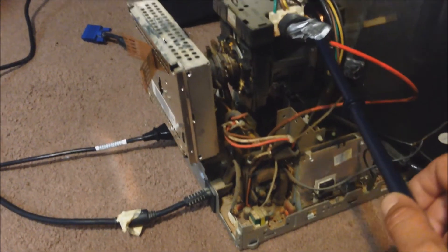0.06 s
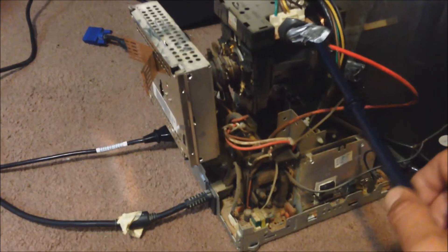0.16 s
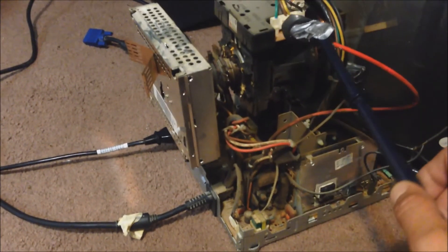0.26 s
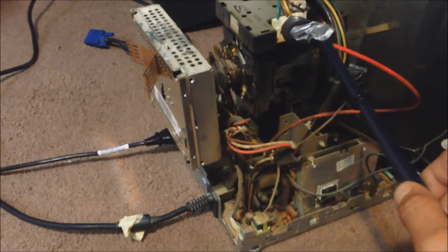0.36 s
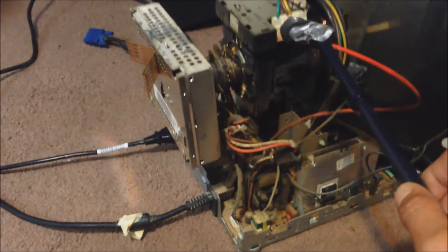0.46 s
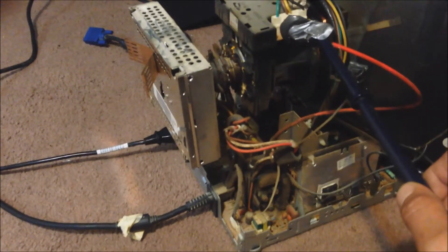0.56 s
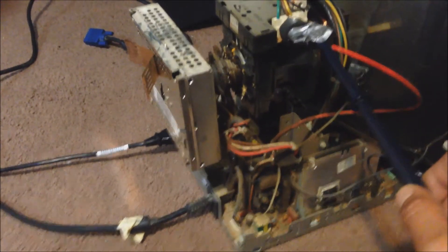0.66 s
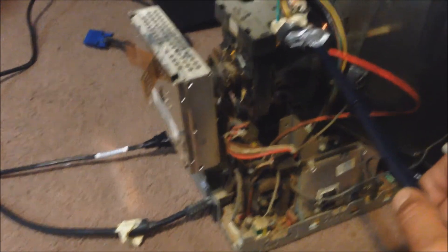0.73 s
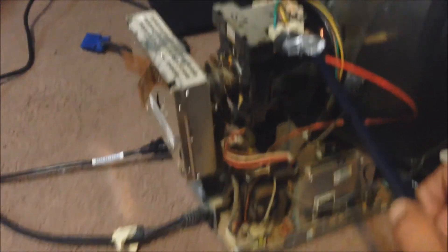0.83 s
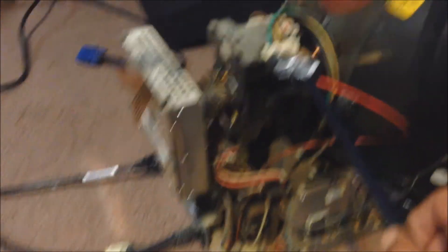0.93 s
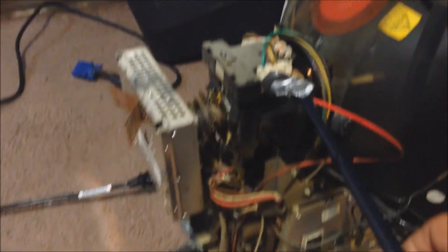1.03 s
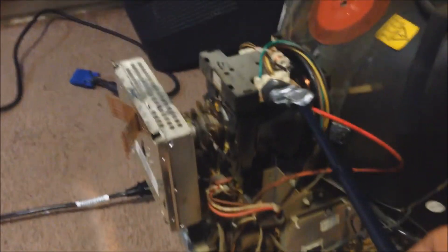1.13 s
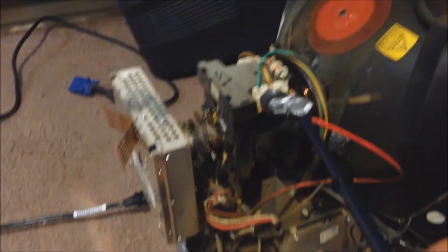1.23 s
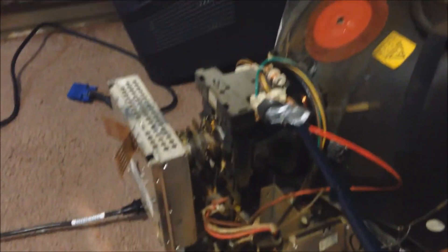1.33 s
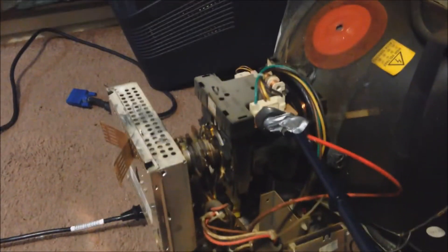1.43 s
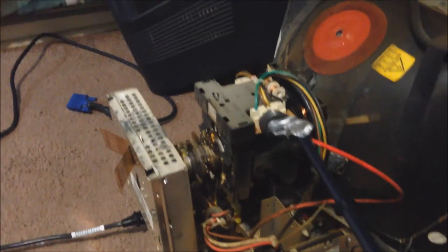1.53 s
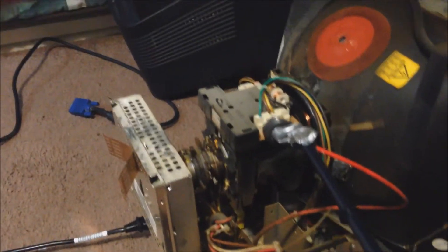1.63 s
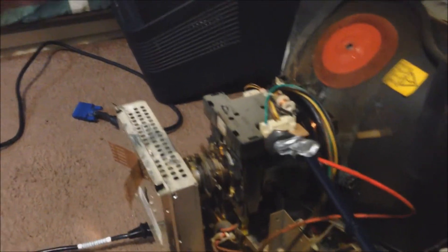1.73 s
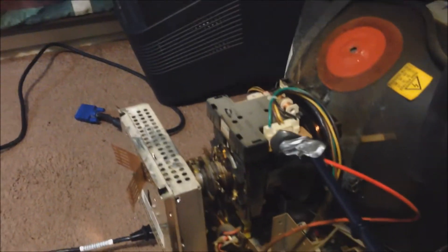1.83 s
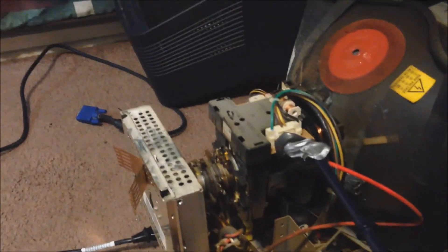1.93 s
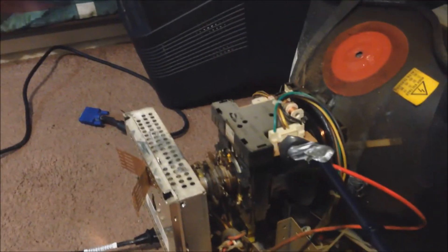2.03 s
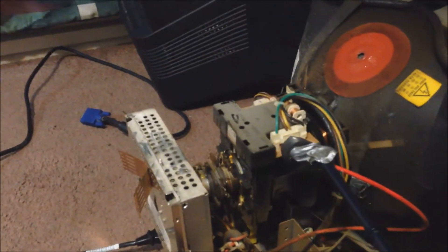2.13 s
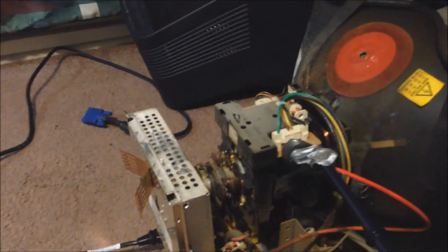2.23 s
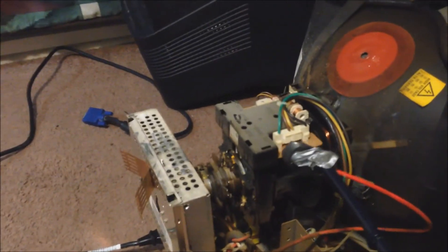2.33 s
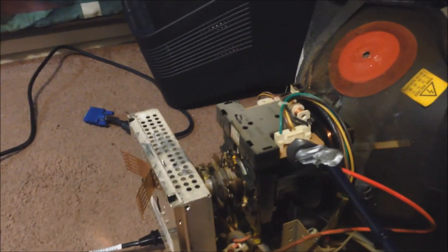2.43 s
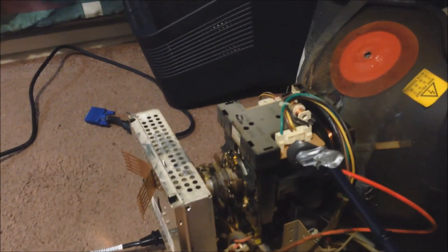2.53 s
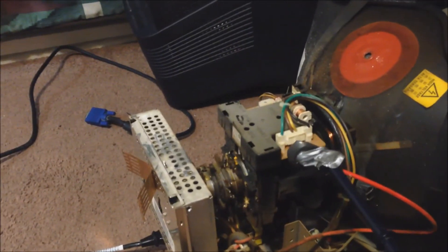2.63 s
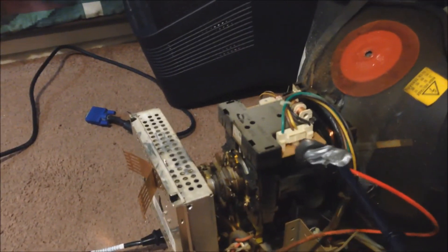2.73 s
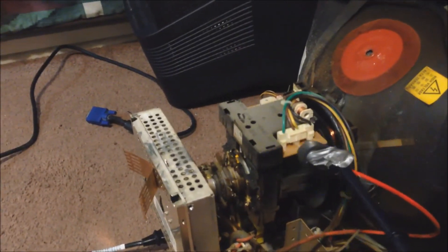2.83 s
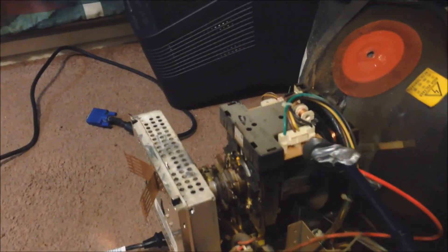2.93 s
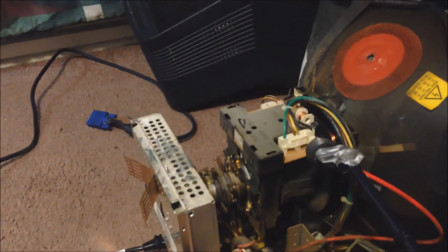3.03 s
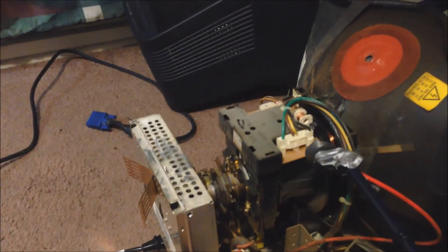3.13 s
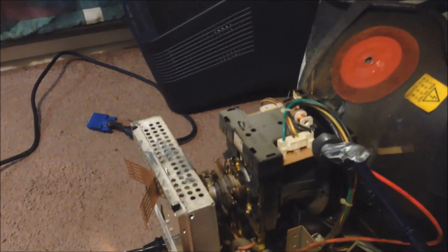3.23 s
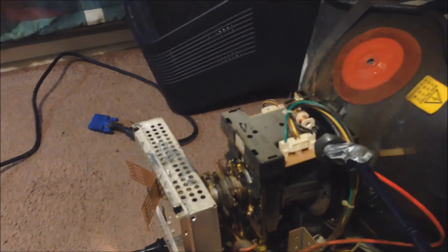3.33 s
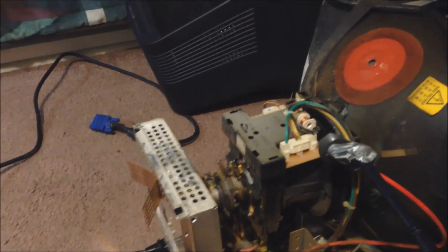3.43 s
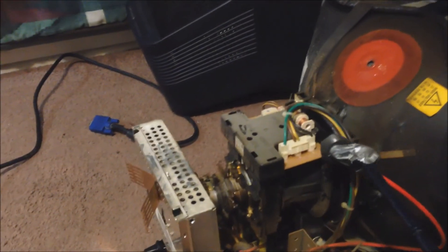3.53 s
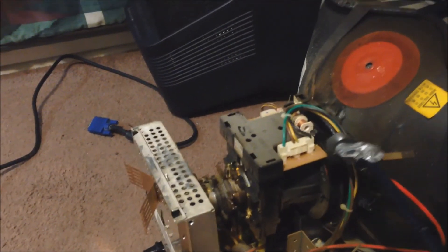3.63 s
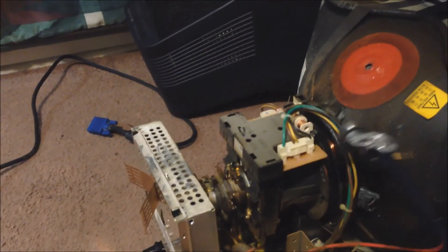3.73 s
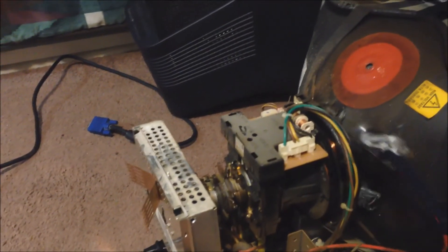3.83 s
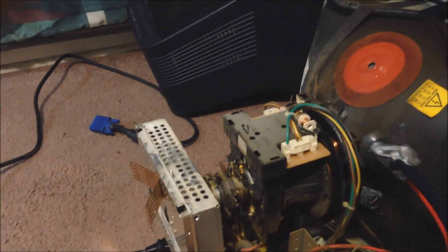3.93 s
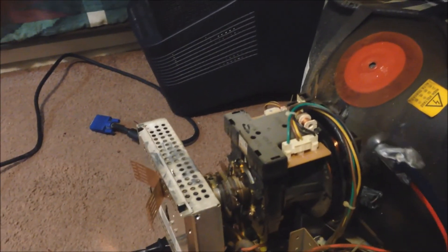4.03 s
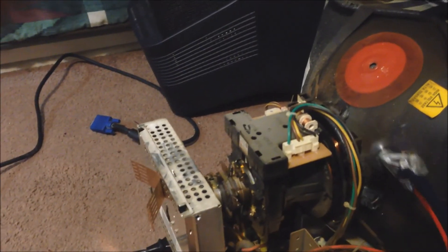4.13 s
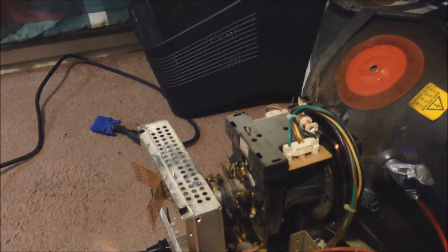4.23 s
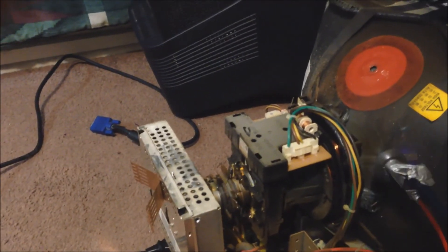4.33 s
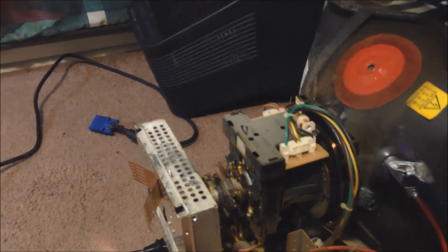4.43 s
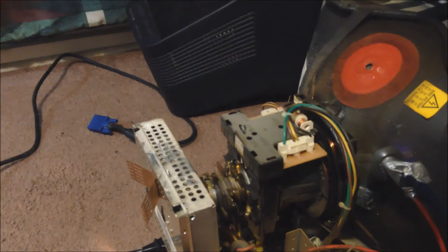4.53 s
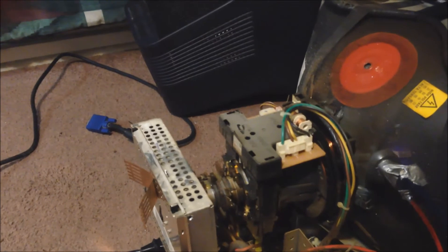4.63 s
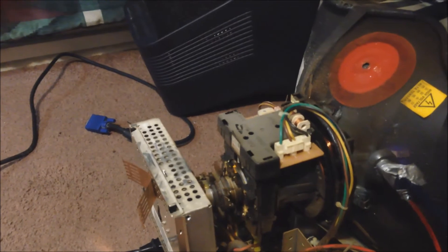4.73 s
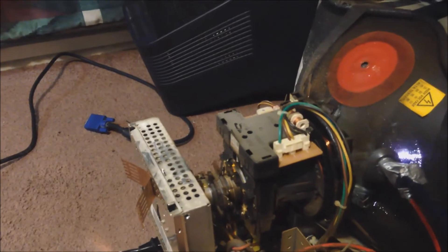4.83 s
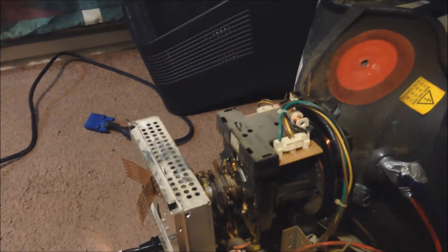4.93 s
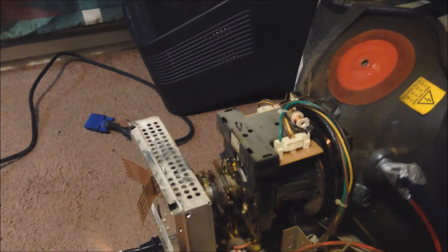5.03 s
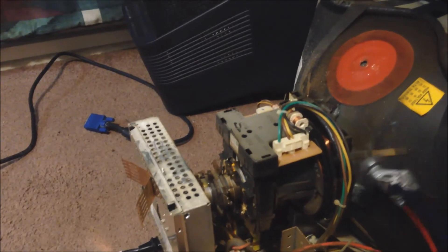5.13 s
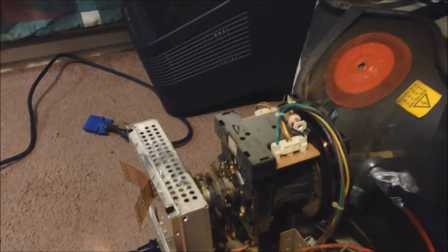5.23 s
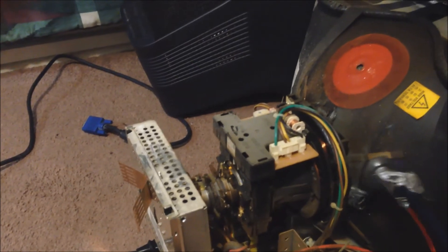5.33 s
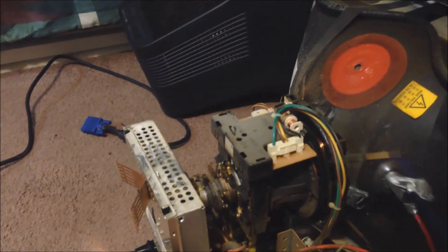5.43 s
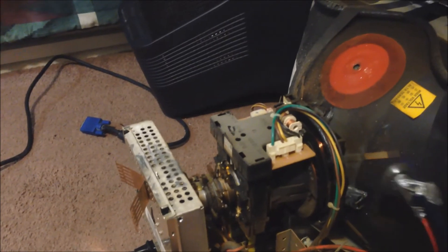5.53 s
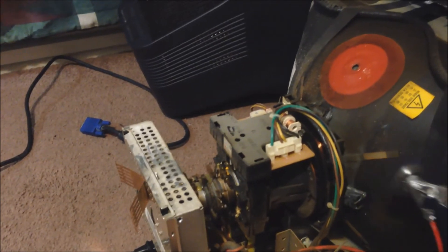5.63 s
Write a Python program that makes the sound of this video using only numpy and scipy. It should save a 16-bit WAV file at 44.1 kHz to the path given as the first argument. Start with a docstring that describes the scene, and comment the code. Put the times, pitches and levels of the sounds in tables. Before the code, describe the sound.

Close in a small room, an electric probe over a dismantled monitor gives a faint, gritty, bright hiss above low rumble and hum. Two sharp snaps crack out about a second apart, each dulling the hiss briefly. Later a rasping spark whine rises, a third and loudest snap cuts it off, hiss rebuilds and the rasp returns. One microphone, overloaded by the snaps.

```python
"""Corona hisses at the tip of a high-voltage probe drawn over the back of a bare picture tube in a small room:
noise of uneven grain, coloured by resonances. Near the glass a relaxation oscillation adds a rasping spark train.
Three times the gap flashes over: decaying chassis modes, a crack and a room tail overload the microphone,
and the hiss has to build up again. Stray sparks and knocks are noise bursts; low sine tones glide over a rumble."""
import sys
import numpy as np
from scipy import signal
from scipy.fft import rfft, irfft
from scipy.io import wavfile
from scipy.ndimage import uniform_filter1d

SR = 44100
rng = np.random.default_rng(int(sys.argv[2]) if len(sys.argv) > 2 else 0)


def persist_wave(psi):
    """Save psi, clipped to +-1, as 16-bit WAV."""
    counts = np.round(np.clip(psi, -1, 1) * 32767).astype(np.int16)
    wavfile.write(sys.argv[1], SR, np.atleast_2d(counts).T)


N = 250047
T = np.arange(N) / SR  # time of each sample [s]

# Corona strength at the probe tip, before surge, drain and flutter: (time [s], level [dB])
CORONA_LEVEL = [(0, -52.5), (.08, -49), (.19, -54.5), (.26, -48.5), (.95, -45.5), (1.1, -47.5),
                (1.98, -48.5), (2.01, -42), (2.5, -56.5), (2.84, -55), (3.26, -48.5), (3.39, -53.5),
                (3.44, -58), (3.52, -60.5), (3.59, -51.5), (3.95, -48), (4.05, -46.5), (5.26, -44.5),
                (5.35, -49)]
# Corona spectrum: (frequency [Hz], level [dB])
CORONA_SPECTRUM = [(300, -17), (1250, -8.5), (1750, 2.5), (2400, 0), (2750, -7), (3100, -7.5), (4000, -5),
                   (5000, -0.5), (7400, -3), (8700, -1), (10800, -1.5), (13000, 2.5), (15200, 6)]
# Moving resonance of the hollow between probe and chassis: (time [s], frequency [Hz], strength [dB])
HOLLOW_RESONANCE = [(0, 6200, 0), (.2, 5960, -8), (.27, 4570, -15.5), (.95, 4730, 6.5), (1.1, 5430, -9.5),
                    (1.9, 6060, -11), (2.5, 8310, -4.5), (3.3, 8430, -5.5), (3.9, 8460, -2.5)]
# The corona swells before a flashover, then stays down until the gap has recharged
SURGE_DB, SURGE_S, DRAINED_DB, RETURN_S = 10, 0.058, -10, 0.044


def corona(grain_db=-0.5, flutter_db=1.0, sputter_db=10.0):
    """Corona discharge: countless micro-discharges of uneven size sum to noise, coloured by a cavity."""
    level_db = curves(CORONA_LEVEL)[0]
    for s, *_, recharge_s in FLASHOVERS:
        surge = SURGE_DB * np.exp(-abs(T - s) / SURGE_S)
        drained = DRAINED_DB * np.clip((s + recharge_s - T) / RETURN_S + .5, 0, 1)
        level_db = level_db + np.where(T < s, surge, drained)
    level = amp(level_db)
    grain = amp(grain_db * np.minimum(rng.exponential(1, N), 4))
    pops = rng.standard_normal(N) * grain
    hiss = through_gaps(coloured(pops, CORONA_SPECTRUM), depth=0.28)
    hollow_hz, hollow_db = curves(HOLLOW_RESONANCE)
    hiss += amp(hollow_db) * resonate(hiss, hollow_hz, width=270)
    # close to breakdown, where the level is high, the discharge begins to sputter
    flutter = flutter_db * wander(hz=39.8)
    sputter = sputter_db * (level / level.max()) ** 2 * wander(hz=160)
    return evened(hiss) * level * amp(flutter + sputter)


# Spark trains, one sub-table each, with the scatter of the gaps in time as a share:
# (time [s], mean rate [sparks/s], level [dB], scatter [1])
SPARK_TRAINS = [
    [(4.0, 1300, -58, .16), (4.05, 1600, -48.5, 0.13), (4.115, 1660, -51, .12), (4.14, 1230, -52.5, .18),
     (4.21, 1240, -50, .15), (4.275, 1450, -41.5, .145), (4.32, 1800, -37.5, .1), (4.6, 1880, -34.5, .098),
     (4.85, 1963, -32, .097), (4.92, 2100, -27.5, .15)],
    [(5.32, 1750, -58.5, 0.13), (5.45, 1810, -39.5, .115), (5.55, 1880, -37.5, 0.053),
     (5.61, 1740, -40, .068), (5.67, 1710, -36, 0.066)],
]
# Spark spectrum: (frequency [Hz], level [dB])
SPARK_SPECTRUM = [(300, -4), (800, 6.5), (1350, 0.5), (1700, 6.5), (2050, 1.5), (2350, -1), (3000, 0),
                  (3350, -1.5), (4100, -5.5), (5400, -2), (6800, -4), (10000, -4), (12500, -5),
                  (15200, -1.5)]
# Whine strength at the usual scatter, and its loss each time the scatter doubles
USUAL_SCATTER, WHINE_DB, WHINE_LOSS_DB = 0.1, -5, 6


def spark_train(drift=0.034, size_db=2.5, wet_db=-2, undertone_db=-20):
    """Relaxation oscillation: the gap charges and fires repeatedly; uneven gaps make a rasping whistle."""
    all_rows = [row for rows in SPARK_TRAINS for row in rows]
    rate, level_db, scatter = curves(all_rows)
    # the more evenly the gap fires, the stronger the whine
    whine_db = WHINE_DB - WHINE_LOSS_DB * np.log2(scatter / USUAL_SCATTER)
    rate = rate * np.exp(drift * wander(hz=54.7) + scatter * wander(hz=925))
    turns = np.cumsum(rate) / SR
    # one spark at each whole turn; subtracting the mean rate removes the offset
    fires = np.diff(np.floor(turns), prepend=0)
    sizes = amp(size_db * wander(hz=600))
    sparks = coloured((fires - rate / SR) * sizes, SPARK_SPECTRUM)
    # the heated air swells once a spark; a faint undertone lies at half that rate
    whine = np.cos(2 * np.pi * turns) + amp(undertone_db) * np.cos(np.pi * turns)
    level = amp(level_db) * sum(gate(rows, fade=0.0013) for rows in SPARK_TRAINS)
    direct = (through_gaps(sparks, depth=1.0) + amp(whine_db) * whine) * level
    return direct + reverberated(direct, wet_db)


# Resonances of the gaps between tube, yoke and chassis, lift before the depth factor:
# (frequency [Hz], width [Hz], lift [dB])
GAP_RESONANCES = [(2490, 65, 1.5), (3920, 490, 5), (4584, 92, 10), (5230, 710, 5), (5930, 180, -1.5),
                  (6240, 340, 3), (6600, 170, -1.5), (8020, 250, 6), (8900, 120, 3.5), (9750, 370, 3.5),
                  (10490, 200, 2.5), (12200, 330, 1), (13910, 330, 4.5), (14900, 440, 2)]


def through_gaps(x, depth, linger_s=.0005):
    """Resonant transmission: narrow bands change in level, with group delay linger_s per dB of lift."""
    hz = np.fft.rfftfreq(N, 1 / SR)
    bells = [db * np.exp(-2 * ((hz - centre) / width) ** 2) for centre, width, db in GAP_RESONANCES]
    lift_db = depth * sum(bells)
    # phase is the integral of group delay over frequency
    lag = 2 * np.pi * np.cumsum(linger_s * lift_db) * SR / N
    return evened(irfft(rfft(x) * amp(lift_db) * np.exp(-1j * lag), N))


# Flashovers; tuning multiplies the chassis frequencies, bounce is the delay of the echo off the glass:
# (time [s], blast [dB], blast centre [Hz], tuning [1], bounce [s], crack [dB], room [dB],
#  noise before the snap [dB], recharge time [s])
FLASHOVERS = [(2.0721, -6, 1620, 0.95, 0.0027, -8, -9.5, -23.5, 0.34),
              (2.8865, -6.5, 1037, .96, 0.00213, -5, -11, -18, .32),
              (4.9262, -1, 884, 0.946, 0.00097, -2.5, -9, -28.5, .29)]
# Chassis modes under a blast, before tuning: (frequency [Hz], level [dB], t60 [s])
CHASSIS_MODES = [(560, 1.5, 0.02), (740, -1, 0.033), (975, 1.5, 0.011), (1344, -3.5, 0.018),
                 (1747, 0.5, 0.018), (2267, 0.5, 0.01), (3440, -12, 0.011)]


def snaps(clump_db=3, clump_s=0.054, bounce=0.52, crack_s=0.0045, build_s=.006, blast_octaves=0.91,
          thump_db=-17, thump_hz=110, thump_s=0.0032):
    """Impulse excitation: a flashover rings the chassis modes, with a bright crack, a thump and the room."""
    out = np.zeros(N)
    for s, blast_db, hz, tuning, bounce_s, crack_db, room_db, *_ in FLASHOVERS:
        tail = room_tail()
        t = np.arange(len(tail)) / SR
        blast = np.zeros(len(t))
        for k, (f, db, t60) in enumerate(CHASSIS_MODES):
            share = np.exp(-.5 * (np.log2(f / hz) / blast_octaves) ** 2)
            decay = amp(db - 60 * t / t60)
            # neighbouring modes swing in opposite senses
            blast += (-1) ** k * share * decay * np.sin(2 * np.pi * f * tuning * t)
        blast += bounce * np.interp(t - bounce_s, t, blast, left=0)
        crack = coloured(rng.standard_normal(len(t)), TAIL_SPECTRUM) * np.exp(-(t / crack_s) ** 2)
        thump = np.sin(2 * np.pi * thump_hz * t) * np.exp(-t / thump_s)
        # the first reflections arrive in uneven clumps
        clumps = amp(clump_db * wander(hz=170)[:len(t)] * np.exp(-t / clump_s))
        room = tail * (1 - np.exp(-t / build_s)) * clumps
        add(out, s, amp(blast_db) * blast + amp(crack_db) * crack)
        add(out, s, amp(thump_db) * thump + amp(room_db) * room)
    return out


# Spectrum of the crack and of the room's answer: (frequency [Hz], level [dB])
TAIL_SPECTRUM = [(60, -14.5), (300, -5), (700, -4.5), (1500, -0.5), (2500, -1), (3300, -0.5), (5500, 1.5),
                 (8000, 0), (10500, 0.5), (13000, 3.5), (15200, 2)]
# Reverberation time of the room: (frequency [Hz], t60 [s])
ROOM_DECAY = [(100, 0.094), (600, 0.16), (1500, 0.28), (5000, 0.27), (15000, 0.22)]


def room_tail():
    """Diffuse reverberation: dense reflections act as noise, each band dying at its own speed."""
    noise = coloured(rng.standard_normal(SR // 2), TAIL_SPECTRUM)
    hz, t, z = signal.stft(noise, SR, nperseg=256)
    decay = amp(-60 * t / read(ROOM_DECAY, hz)[:, None])
    return signal.istft(z * decay, SR, nperseg=256)[1]


def reverberated(direct, wet_db):
    """Linear superposition: convolution with a room tail of unit energy gives the reverberant part."""
    tail = room_tail()
    return amp(wet_db) * signal.fftconvolve(direct, tail / np.linalg.norm(tail))[:N]


# Peak of the noise ahead of the snap, and its exponential time constants
PRE_AHEAD_S, PRE_RISE_S, PRE_DECAY_S = 0.008, 0.0032, 0.0033


def pre_snap_noise():
    """Exponential envelope: soft dull noise swells and fades before each snap."""
    out = np.zeros(N)
    noise = band_noise(1350, 0.73, size=N)
    for s, *_, pre_db, _ in FLASHOVERS:
        t = T - s + PRE_AHEAD_S
        out += amp(pre_db) * noise * np.exp(np.minimum(t / PRE_RISE_S, -t / PRE_DECAY_S))
    return out


# Spacing, level of the first burst and change of level for the second burst
AFTER_S, AFTER_DB, AFTER_LOSS_DB = .0193, -15, -11


def after_bursts():
    """Exponential decay: two short dull noise bursts follow each snap, the second weaker."""
    out = np.zeros(N)
    for s, *_ in FLASHOVERS:
        for k in range(2):
            after_db = AFTER_DB + k * AFTER_LOSS_DB
            add(out, s + (k + 1) * AFTER_S, burst(after_db, hz=1130, octaves=0.31, decay_s=0.0013))
    return out


# Stray single sparks: (time [s], level [dB], centre [Hz], width [octaves], decay constant [s])
STRAY_SPARKS = [(.972, -39, 6000, 5.4, 0.012), (1.01, -41, 8000, 2.64, 0.0027),
                (1.044, -40.5, 5000, 2.4, 0.0087), (2.0, -35.5, 6000, 2, 0.0031),
                (2.622, -53.5, 7100, 1.7, 0.004), (3.526, -21, 13300, 0.55, 0.0023)]


def stray_sparks():
    """Impulsive discharge: each single spark is a short decaying burst of noise."""
    out = np.zeros(N)
    for s, *spark in STRAY_SPARKS:
        add(out, s, burst(*spark))
    return out


# Soft knocks of handling: (time [s], level [dB])
HANDLING_KNOCKS = [(.35, -54.5), (.872, -45.5), (2.24, -48), (2.775, -52)]


def knocks():
    """Damped impact: each knock is a narrow, quickly decaying burst of noise."""
    out = np.zeros(N)
    for s, db in HANDLING_KNOCKS:
        add(out, s, burst(db, hz=590, octaves=0.29, decay_s=0.007))
    return out


def ticks(wet_db=-18):
    """Superposition of the brief sounds, with a little reverberation."""
    direct = stray_sparks() + knocks() + pre_snap_noise() + after_bursts()
    return direct + reverberated(direct, wet_db)


# Low hum, one sub-table a glide, level before boom and waver: (time [s], pitch [Hz], level [dB])
HUM_GLIDES = [
    [(0, 172, -57.5), (.5, 166.6, -53), (.66, 162, -65), (.76, 158, -59.5), (.98, 156, -59.5),
     (1.08, 150, -64), (1.8, 144.5, -59.5), (2.03, 143.9, -57)],
    [(2.13, 155.8, -57.5), (2.39, 173.7, -51.5), (2.52, 180, -73), (2.68, 184, -55)],
    [(3.17, 221, -61.5), (3.48, 215, -53), (3.76, 227.6, -58.5)],
    [(3.7, 74.85, -56), (3.96, 82.7, -54), (4.27, 89.2, -50.5), (4.48, 88, -54), (4.66, 99.1, -59),
     (4.88, 104.9, -55.5)],
    [(5.35, 90.9, -66), (5.56, 92.6, -63), (5.67, 102.7, -50.5)],
]
# Octave relative to the note before boom, by pitch of the note: (pitch [Hz], level [dB])
OCTAVE_LEVEL = [(77, 3), (88, -7.5), (101, 4.5), (150, -25.5)]
MAINS_HZ, MAINS_DB = 55.7, -59


def hum(waver_db=1.1):
    """Modal amplification: a low note glides through the room's modes, with its octave and a mains hum."""
    out = amp(MAINS_DB) * np.sin(2 * np.pi * MAINS_HZ * T)
    for rows in HUM_GLIDES:
        hz, db = curves(rows)
        phase = 2 * np.pi * (np.cumsum(hz) / SR + rng.random())
        fundamental = amp(boom_db(hz)) * np.sin(phase)
        octave = amp(read(OCTAVE_LEVEL, hz)) * np.sin(2 * phase)
        out += gate(rows, fade=0.01) * amp(db) * (fundamental + octave)
    # the root of 2 turns rms levels into sine amplitudes
    return np.sqrt(2) * out * amp(waver_db * wander(hz=9.7))


# Modes of the room that make the hum boom: (frequency [Hz], width [Hz], lift [dB])
BOOM_MODES = [(82.4, 4.7, 9), (157, 4.8, 7.5), (174.55, 9.2, 13)]


def boom_db(hz):
    """Room resonance: each mode lifts a low tone along a bell curve of frequency."""
    return sum(db / (1 + (2 * (hz - centre) / width) ** 2) for centre, width, db in BOOM_MODES)


# Rumble spectrum: (frequency [Hz], level [dB])
RUMBLE_SPECTRUM = [(15, -40), (28, -17.5), (42, -3.5), (58, 0.5), (100, -3), (140, -5.5), (185, -7.5),
                   (222, -6), (260, -10), (310, -9), (460, -15), (700, -21.5), (1300, -27.5), (2500, -48),
                   (5000, -75)]
# Swell of the rumble: (time [s], level [dB])
RUMBLE_LEVEL = [(0, -54.5), (1, -55.5), (2, -54.5), (3.2, -55), (4.3, -51), (5.67, -51)]


def rumble(air_db=-71):
    """Background noise: the room's low, slowly swelling noise and a faint band of air noise."""
    low = coloured(rng.standard_normal(N), RUMBLE_SPECTRUM) * amp(curves(RUMBLE_LEVEL)[0])
    return low + amp(air_db) * band_noise(690, 0.78, size=N)


def burst(db, hz, octaves, decay_s):
    """Exponential decay: a puff of band noise starts at once and dies away."""
    t = np.arange(SR // 10) / SR
    return amp(db) * band_noise(hz, octaves, size=len(t)) * np.exp(-t / decay_s)


def band_noise(hz, octaves, size):
    """Band-pass filtering: noise under a Gaussian bell on a log-frequency axis, at rms 1."""
    away = np.log2((np.fft.rfftfreq(size, 1 / SR) + 1) / hz) / octaves
    return evened(irfft(rfft(rng.standard_normal(size)) * np.exp(-.5 * away ** 2), size))


def coloured(x, points):
    """Spectral shaping: multiplies x by a spectrum and scales it to rms 1."""
    gain = amp(read(points, np.fft.rfftfreq(len(x), 1 / SR)))
    return evened(irfft(rfft(x) * gain, len(x)))


def resonate(x, hz, width):
    """Heterodyne resonance: shifts the curve hz to zero, low-passes, and shifts back."""
    turn = np.exp(2j * np.pi * np.cumsum(hz * np.ones(len(x))) / SR)
    r = np.exp(-np.pi * width / SR)
    smooth = signal.lfilter([1 - r], [1, -r], x / turn + 1e-18)
    return 2 * (turn * smooth).real


def wander(hz):
    """Low-pass random process: smooth chance, at rms 1, with changes up to about hz."""
    lowpass = 1 / (1 + (np.fft.rfftfreq(N, 1 / SR) / hz) ** 4)
    return evened(irfft(rfft(rng.standard_normal(N)) * lowpass, N))


def amp(db):
    """Logarithmic level: decibels to amplitude gain."""
    return 10 ** (np.asarray(db) / 20)


def evened(x):
    """Energy normalisation: scales x to rms 1."""
    return x / np.sqrt(np.mean(x ** 2) + 1e-20)


def read(points, hz):
    """Logarithmic frequency scale: interpolates a table's value at hz."""
    f, value = np.transpose(points)
    return np.interp(np.log(hz + 1), np.log(f + 1), value)


def curves(rows):
    """Linear interpolation: each column of a timed table at every sample."""
    s, *columns = np.transpose(rows)
    return [np.interp(T, s, c) for c in columns]


def gate(rows, fade):
    """Linear envelope: 1 while the table lasts, fading over fade seconds outside both ends."""
    return np.clip(1 + np.minimum(T - rows[0][0], rows[-1][0] - T) / fade, 0, 1)


def add(mix, s, sound):
    """Superposition: mixes a sound in at time s."""
    part = mix[round(s * SR):][:len(sound)]
    part += sound[:len(part)]


def scene():
    """Superposition of pressures: everything reaches one microphone, given as two equal channels."""
    mono = corona() + spark_train() + snaps() + ticks() + hum() + rumble()
    return np.tile(mono, (2, 1))


def record(dry, ceiling=1.0, threshold_db=-21, slope=0.73, recovery_db=26, attack_s=0.0076):
    """Saturation and gain control: loud snaps overload and duck the level; then the band is limited."""
    clipped = ceiling * np.tanh(dry / ceiling)
    power_db = 10 * np.log10(abs(uniform_filter1d(clipped[0] ** 2, size=200)) + 1e-12)
    # held peaks fall by recovery_db each second
    fall = T * recovery_db
    held_db = np.maximum.accumulate(power_db + fall) - fall
    over_db = np.maximum(held_db - threshold_db, 0)
    r = np.exp(-1 / (attack_s * SR))
    ducked = clipped / amp(slope * signal.lfilter([1 - r], [1, -r], over_db))
    highpass = signal.butter(2, 44, "highpass", fs=SR, output="sos")
    thinned = signal.sosfilt(highpass, ducked)
    lowpass = signal.firwin(611, 15400, window=("kaiser", 8), fs=SR)  # upper band edge in Hz
    return signal.oaconvolve(thinned, lowpass[None], "same")


dry = scene()
out = record(dry)
persist_wave(out)
```